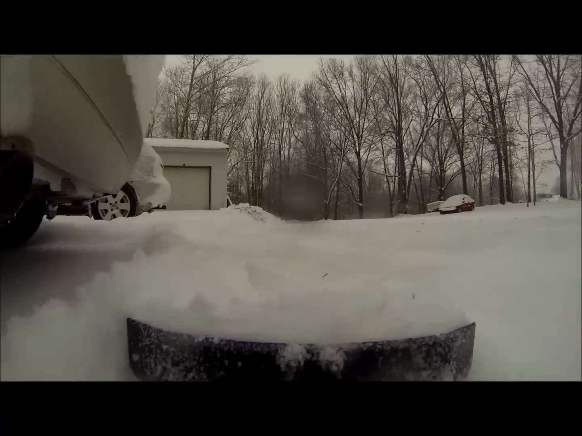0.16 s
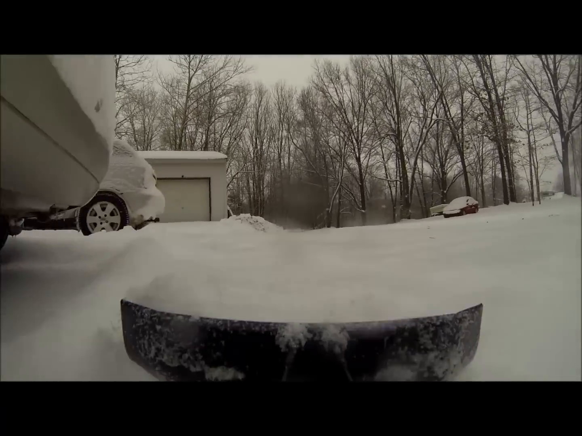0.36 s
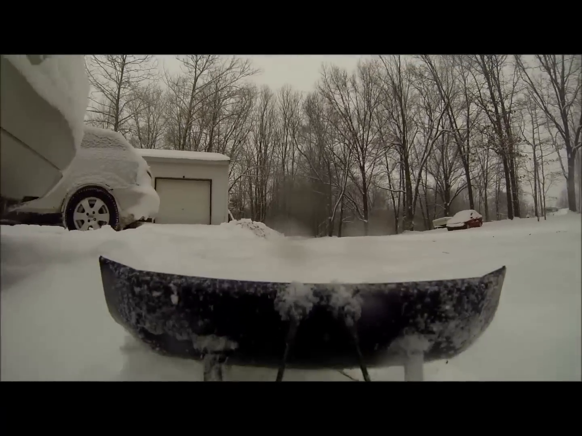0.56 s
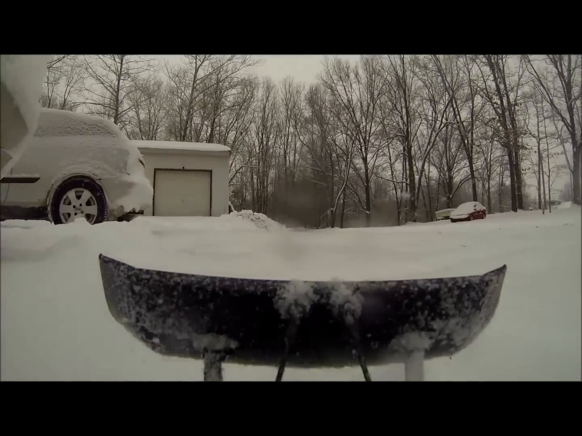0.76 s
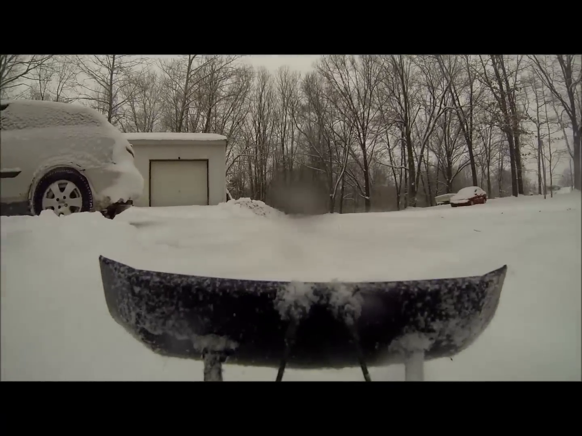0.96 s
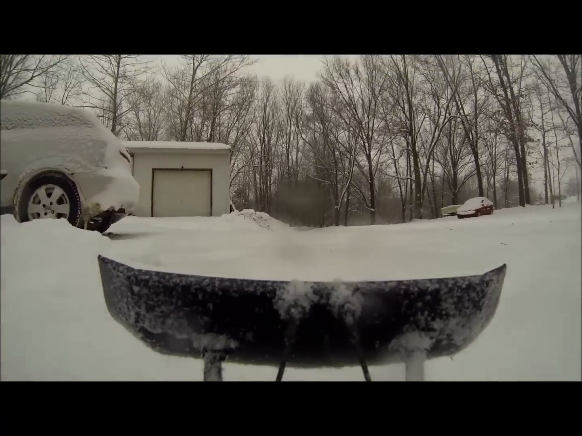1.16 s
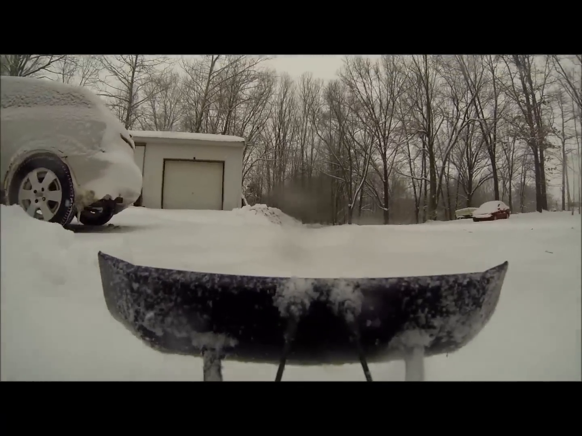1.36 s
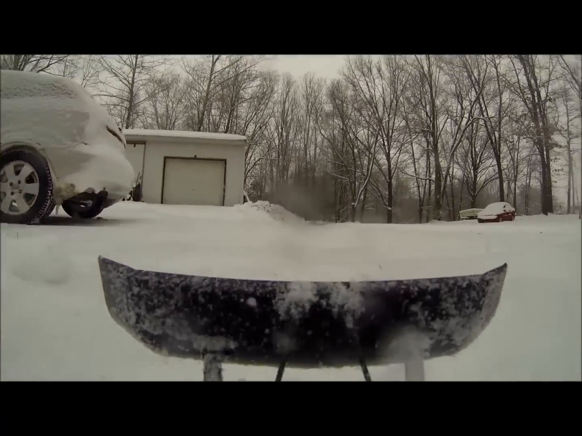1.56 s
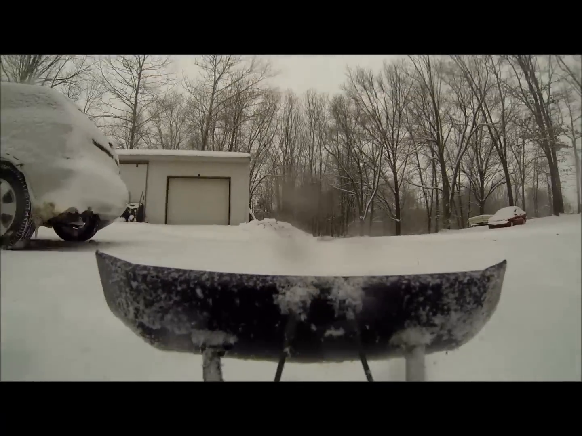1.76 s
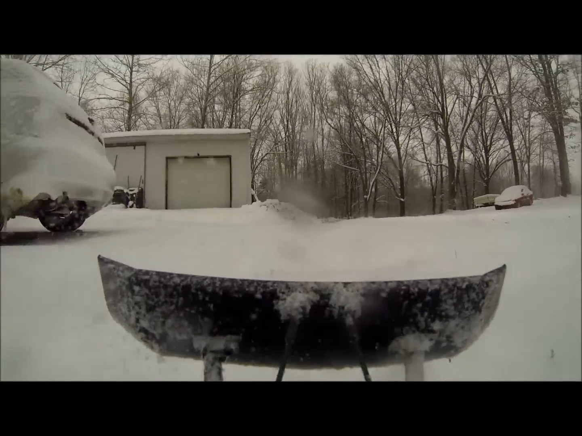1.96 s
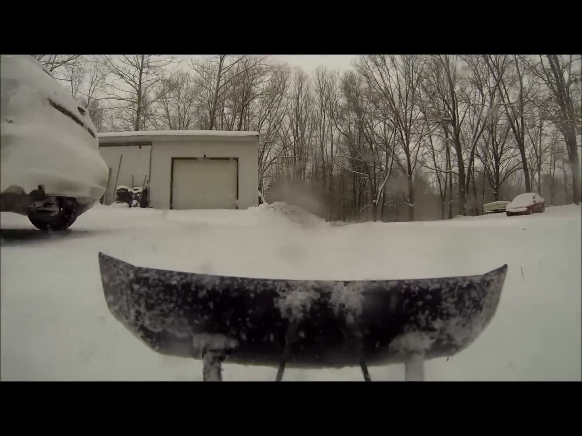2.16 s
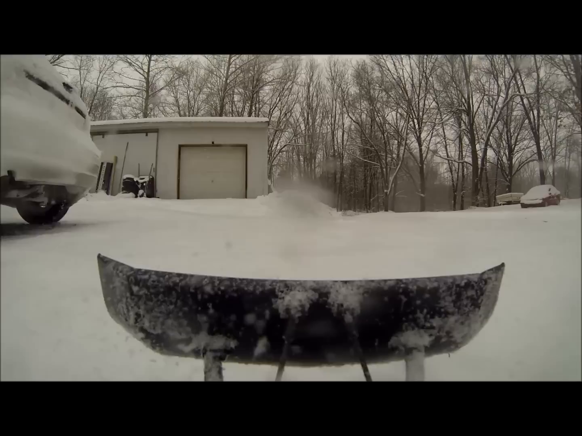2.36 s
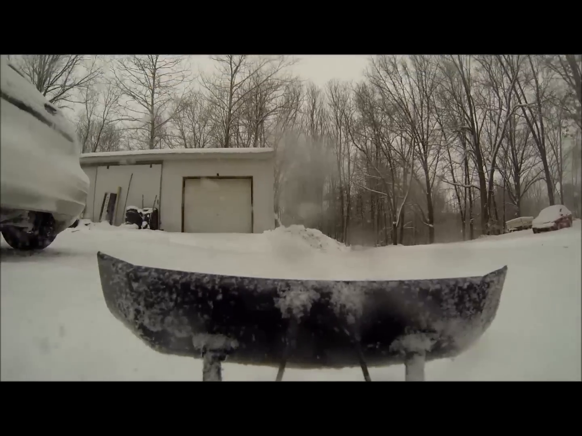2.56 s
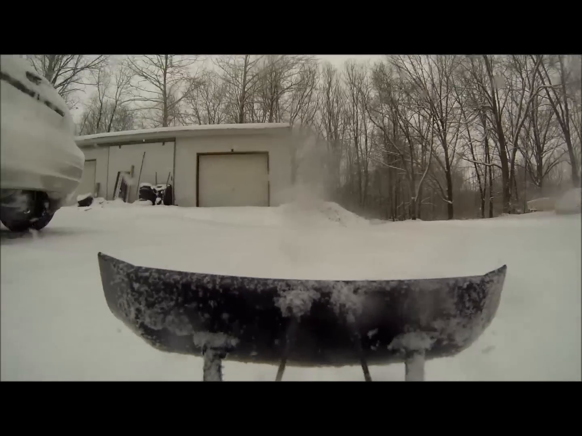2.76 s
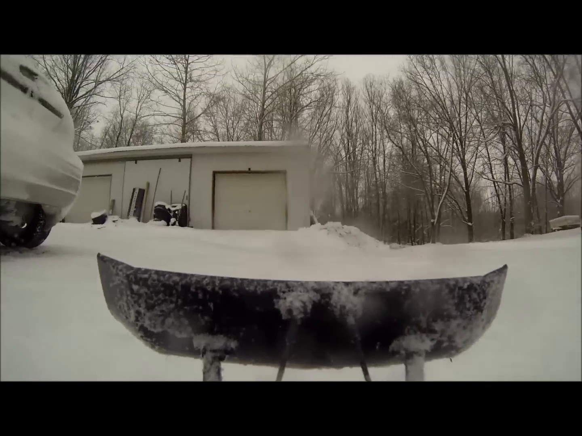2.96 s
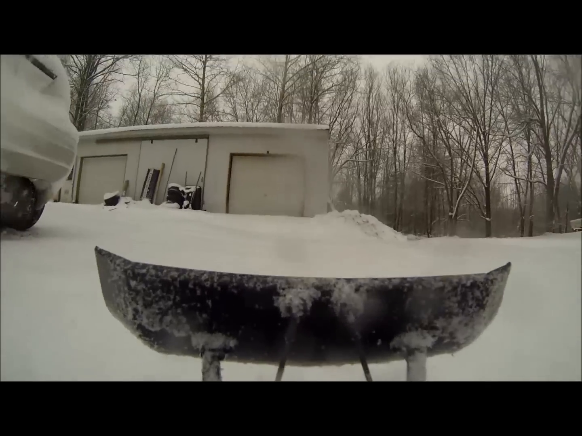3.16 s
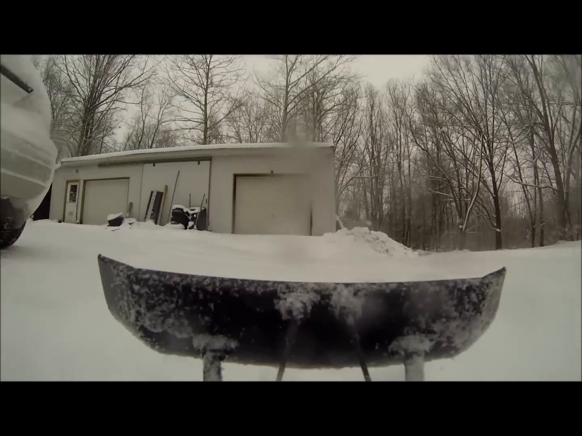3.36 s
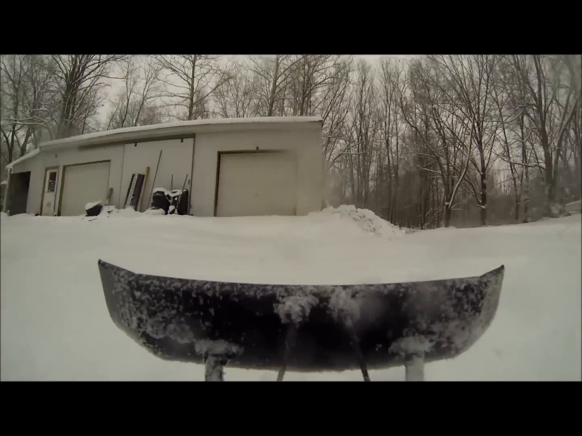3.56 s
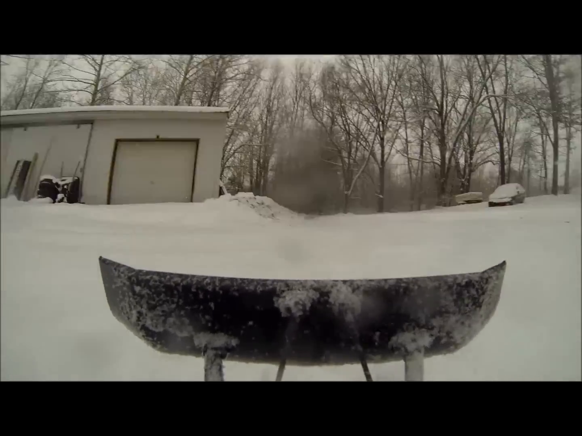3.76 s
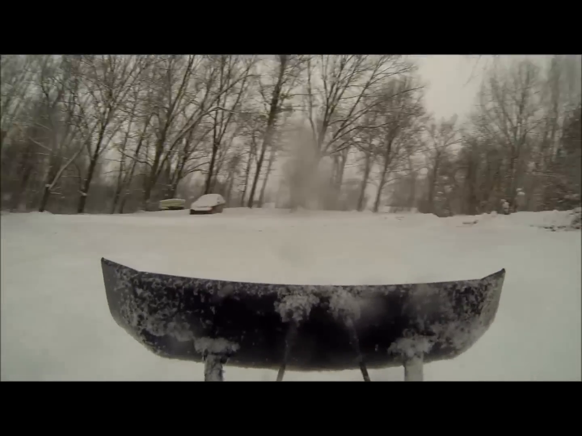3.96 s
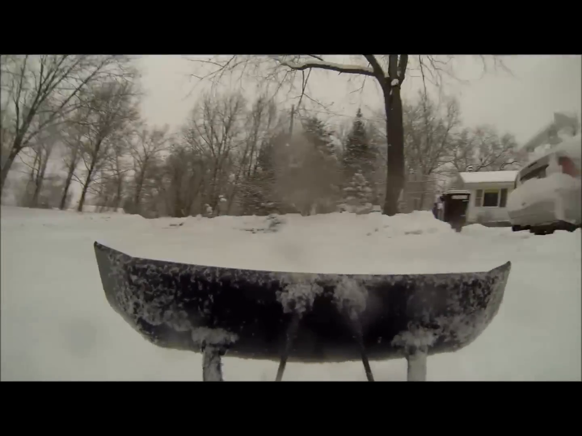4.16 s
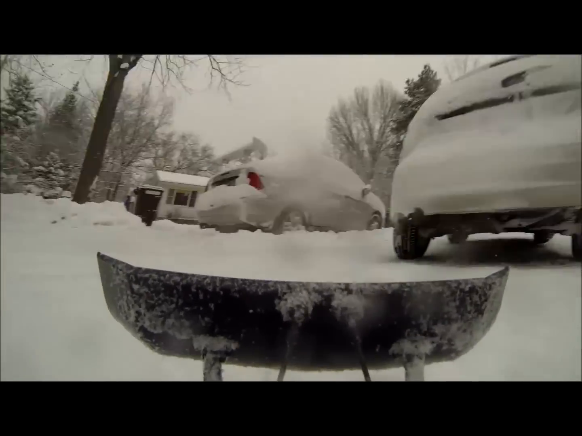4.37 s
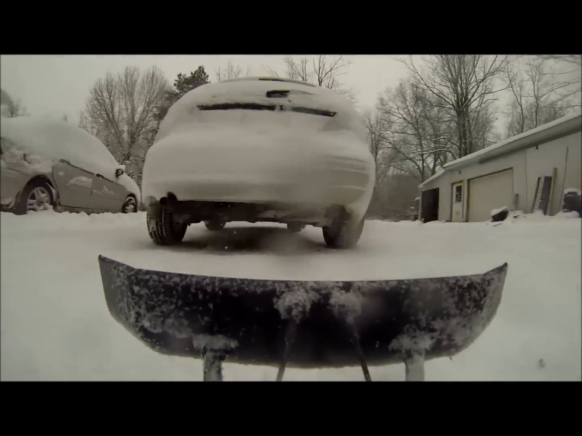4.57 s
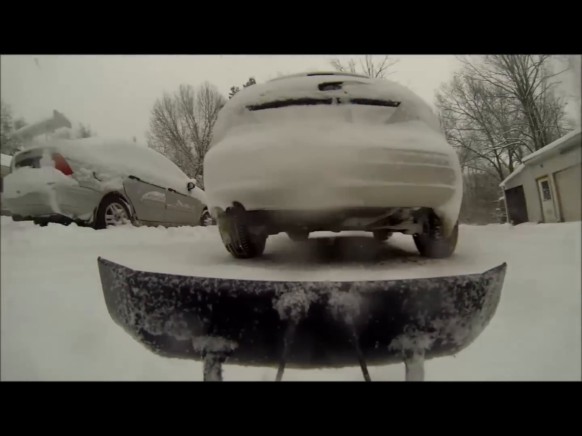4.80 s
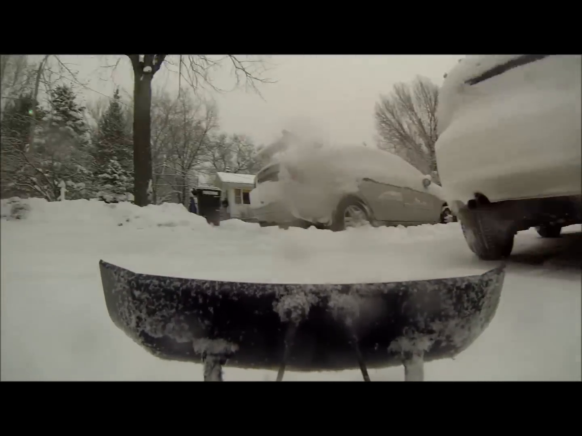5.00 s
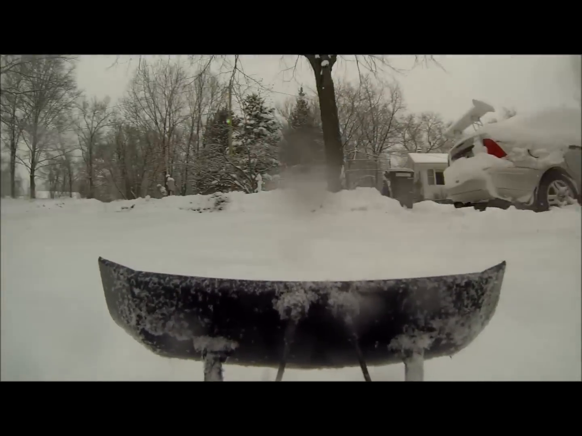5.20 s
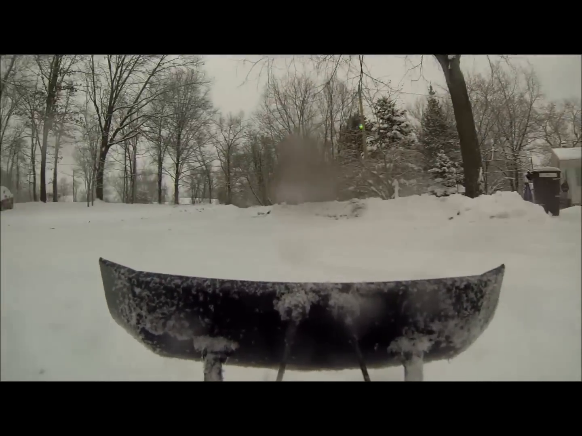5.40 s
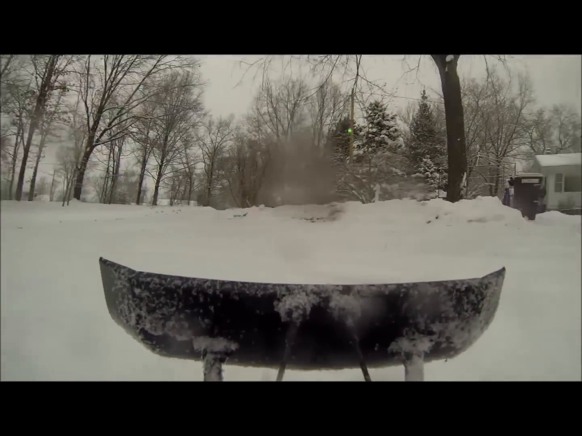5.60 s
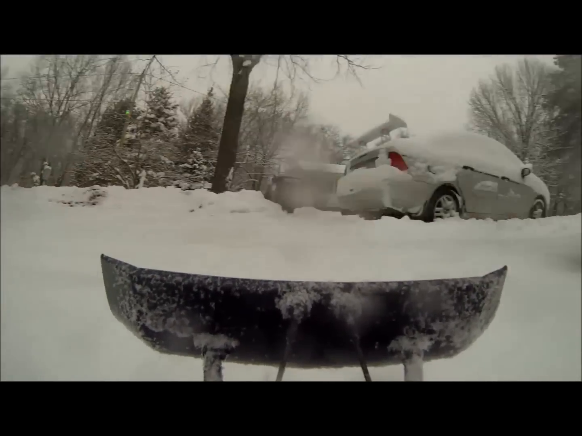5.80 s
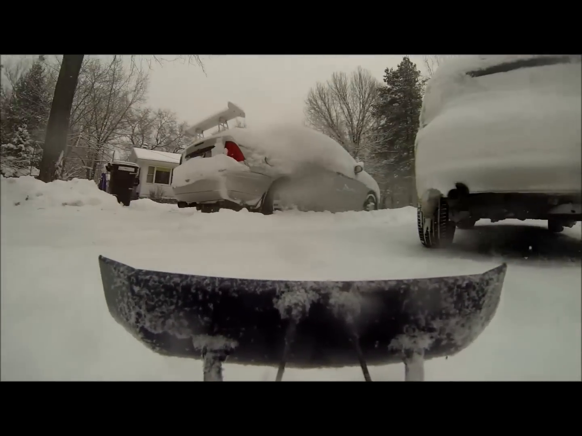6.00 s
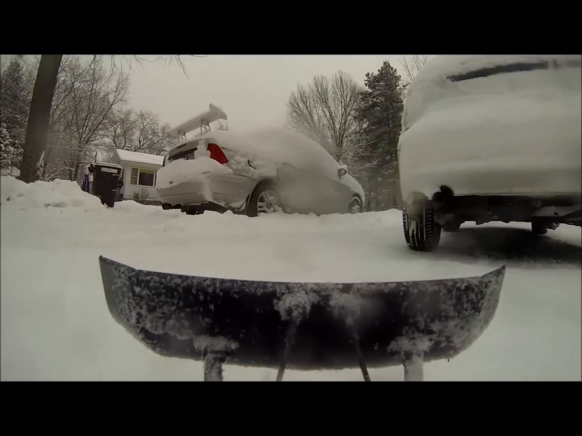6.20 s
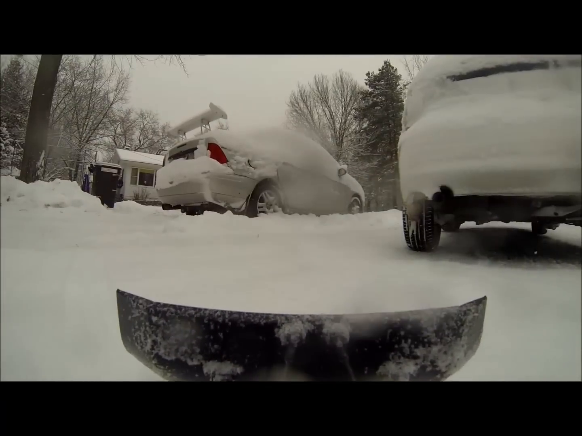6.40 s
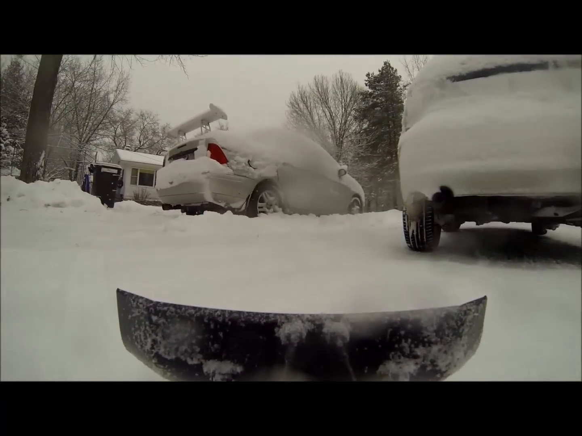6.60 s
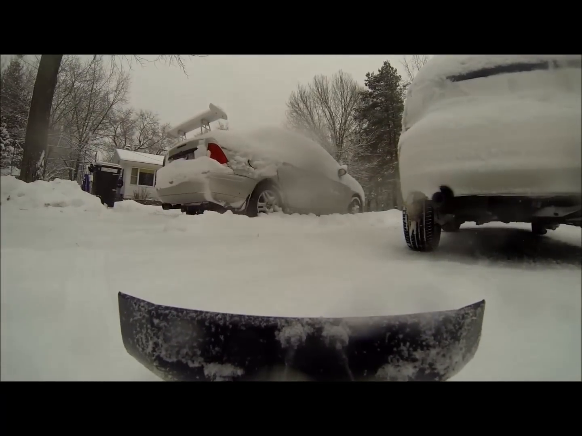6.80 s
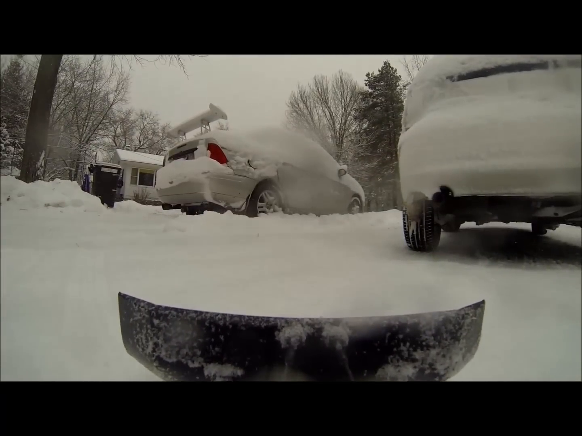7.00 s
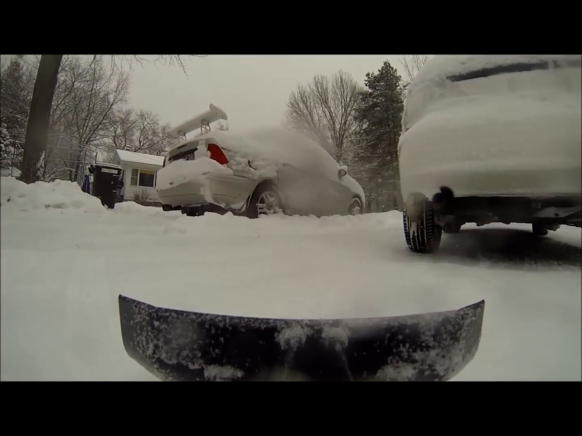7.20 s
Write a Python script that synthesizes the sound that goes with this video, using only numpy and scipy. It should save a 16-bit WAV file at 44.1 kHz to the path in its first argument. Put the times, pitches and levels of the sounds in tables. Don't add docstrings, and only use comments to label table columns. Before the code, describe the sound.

Inside a sealed case bolted to a small motorised snow plough, tracks and gears grind roughly, with low rumble, thumps, nasal metallic ringing, wavering motor whine and icy ticks. Squeals crowd the turn around five seconds. Drive stops after six seconds; the blade lowers in two knocking jerks with a faint servo buzz between, and finally the gears bite again.

```python
import sys
import numpy as np
from scipy import signal
from scipy.fft import rfft, irfft, next_fast_len
from scipy.io import wavfile
from scipy.ndimage import uniform_filter1d, map_coordinates

SR = 44100
rng = np.random.default_rng(int(sys.argv[2]) if len(sys.argv) > 2 else 0)


def dump_mix(stems):
    frames = np.atleast_2d(stems).T
    limited = np.clip(frames, -1, 1)
    pcm = np.round(limited * 32767).astype(np.int16)
    wavfile.write(sys.argv[1], SR, pcm)


def ratio_of_db(decibels):
    return 10 ** (np.asarray(decibels, float) / 20)


N = 319725
T = np.arange(N) / SR

# frequency_hz, density_db
HISS_SPECTRUM = [(30, 0), (100, -27), (300, -34.5), (1300, -42.5), (5000, -51.5), (9000, -57.5),
                 (12800, -61), (13100, -76)]
# first_s, last_s, rate_per_s, level_db
SERVO_PULSES = (6.3951, 6.72, 45.63, -52)
# centre_hz, width_hz, level_db
SERVO_MODES = [(100, 90, 3), (205, 60, 8), (375, 95, 5), (727, 30, -3), (1000, 300, -24), (1290, 125, 5),
               (1480, 130, -12), (2280, 180, -13), (3050, 300, -22), (3700, 500, -26)]
# start_s, push_db, sign, pitch_hz, t60_s
SWAYS = [
    (4.245, -7, -1.6, 15, 0.69),
    (6.24, -14.5, 0.93, 9.15, 0.75),
    (6.373, -3.5, -1.7, 13.5, 0.18),
    (6.389, -16, 1, 22.8, 0.46),
    (6.416, -2, 0.93, 12.46, 0.49),
    (6.818, -25, 1, 28, 0.36),
    (6.672, -20, 0.95, 14.8, 0.53),
    (6.841, -10, 0.89, 16.5, 0.38),
    (7.05, -29.5, -0.78, 18, 0.67),
    (7.229, -1.5, -1, 48, 0.34),
]
# start_s, peak_db, low_db
TICKS = [(1.2827, -51, 0), (1.4215, -44.5, -11), (1.6385, -43, -5.5), (1.7371, -46, -6),
         (1.9724, -55.5, -5), (2.3481, -58, 14), (2.6114, -54, -5), (2.7947, -38.5, -4), (3.0834, -41, -7),
         (3.121, -35, -12), (3.1396, -39, -14), (3.282, -32, -4), (3.3315, -36, -18), (3.6066, -44.5, -1),
         (3.7113, -46.5, -6), (3.7245, -45, -12), (3.758, -46.5, 2), (3.8046, -38, -13), (4.0706, -43, -8),
         (4.0977, -51, -8), (4.177, -32.5, -1), (4.2165, -57.5, 18), (4.2525, -34.5, 2), (4.273, -52, 4),
         (4.286, -44, -12), (4.289, -44.5, -12), (4.3616, -38.5, -16), (4.847, -53, -6), (5.0789, -44, 1),
         (5.0908, -37, 0), (5.03, -56, 10), (5.24, -58, 16), (6.357, -62, 9), (6.364, -61.5, 11),
         (6.733, -64, 13), (6.886, -71.5, 6)]
# start_s, peak_db, thud_db
KNOCKS = [(6.173, -48, 23), (6.221, -43, 15), (6.239, -19.5, -13), (6.247, -28, -8), (6.335, -37, -3),
          (6.345, -35, -4), (6.358, -36, -6), (6.144, -52, 0), (6.164, -56, 4), (6.733, -36, -13),
          (6.757, -26, -11), (6.788, -43, 2), (6.824, -58, 7), (6.886, -59, -6)]
# centre_hz, width_hz, level_db
LINKAGE_MODES = [(930, 250, -6), (1200, 350, 0), (1450, 300, -3), (2200, 450, 0), (3900, 900, -22)]
# centre_hz, width_hz, level_db
SPRAY_MODES = [(5720, 670, -2.5), (6500, 1500, -11.5), (7130, 400, -7.5), (7840, 550, -2),
               (9560, 1600, -11), (8400, 650, -5), (11100, 2900, -17), (12950, 1400, -21)]
# start_s, end_s, level_db
POWDER_GUSTS = [
    (4.58, 5.47, -3.5),
    (5.481, 6.11, 2.5),
    (6.257, 6.327, 11.5),
    (6.716, 6.79, -9.5),
]
# start_s, peak_db, pitch_hz
CATCHES = [(0.0786, -13, 1323), (0.208, -6, 1335), (0.2633, -11.5, 1375), (0.386, -8, 1327),
           (0.3915, -2, 1357), (0.5522, -11, 1430), (0.595, -4.5, 1321), (0.644, -21, 1410),
           (0.6814, -11.5, 1390), (0.848, -13, 1340), (0.9976, -9.5, 1396), (1.1635, -6, 1410),
           (1.2853, -12.5, 1450), (1.5658, -16, 1479), (1.8595, -9, 1425), (2.5304, -8, 1358),
           (2.9342, -13, 1421), (2.9617, -12, 1360), (3.056, -8, 1360), (3.165, -10, 1410),
           (3.274, -13, 1340), (3.35, -8.5, 1380), (3.9817, -15, 1301), (4.2113, -15, 1470),
           (4.4623, -12, 1493), (4.9272, -8.5, 1316), (4.981, -17, 1310), (5.486, -8.5, 1400),
           (5.623, -10.5, 1475)]
# start_s, peak_db, pitch_hz
CHIRPS = [(1.1947, -34, 4833), (1.284, -30, 4990), (1.8592, -32, 4842), (1.944, -36, 4840),
          (2.0627, -40, 4800), (2.5052, -37, 5190), (2.8335, -37, 5060), (2.9203, -30, 4896),
          (3.0375, -31.5, 4960), (3.2086, -37, 5040), (3.4326, -32.5, 4910), (4.7556, -31, 4940),
          (4.815, -35, 4890), (4.9876, -33, 4810), (5.1776, -37, 4850), (5.3926, -40, 4970)]
# start_s, peak_db, pitch_hz
SETTLINGS = [
    (6.821, -60, 1440),
    (6.888, -62, 1450),
    (7.2252, -16, 1304),
    (7.2312, -20, 1254),
    (7.24553, -5, 1286),
]
# start_s,
# peak_db, pitch_hz
THUMPS = [(0.087, -17.5, 204), (0.364, -14.5, 180), (0.438, -6, 293), (0.825, -18, 233), (1.007, -9.5, 269),
          (1.099, -13, 300), (1.174, -5.5, 304), (1.452, -17, 317), (3.046, -10.5, 292),
          (3.325, -16.5, 197), (3.654, -12, 271), (4.062, -5, 159), (4.151, -7, 296), (4.414, -9, 242),
          (4.866, -12, 143), (5.497, -12, 143), (5.616, -7, 186), (5.973, -22, 199), (6.054, -10.5, 221),
          (6.173, -12, 90), (6.1735, -19, 228)]
# start_s, peak_db, pitch_hz
THROBS = [(0.118, -3, 56), (0.264, -11, 59.4), (0.51, -10, 82.5), (0.855, -9.5, 78.4), (1.033, -10, 105),
          (1.159, -10, 74.6), (1.376, -8, 91.5), (1.709, -9.5, 94.2), (2.047, -7, 99.5), (2.41, -11, 70.0),
          (2.744, -18, 83.4), (2.921, -9, 98.4), (3.167, -11, 83.4), (3.445, -13, 97), (3.737, -19, 102),
          (3.992, -6, 87.5), (4.729, -8, 72.7), (4.838, -7, 109), (5.02, -10, 80.7), (5.425, -10, 61.9),
          (5.878, -9, 75), (6.068, -5.5, 68.5)]
# start_s, peak_db, pitch_hz
RESTART_JERKS = [
    (7.2348, -14, 563),
    (7.2435, -4.5, 280),
]
# start_s, end_s, first_hz, last_hz, level_db
SQUEALS = [(.01, .19, 1380, 1330, -28), (.5, .64, 1390, 1340, -26), (.75, .95, 2200, 2270, -36),
           (.78, 1.05, 3020, 3090, -45), (.84, .96, 880, 1010, -39), (.97, 1.06, 3750, 4050, -46),
           (1.07, 1.22, 1320, 1400, -28), (2.05, 2.5, 1545, 1550, -36), (4.5, 4.54, 2150, 2280, -30),
           (4.725, 4.8, 1250, 1420, -24), (4.73, 4.78, 5000, 4620, -46), (4.79, 4.83, 1560, 1500, -30),
           (4.81, 4.893, 1450, 1330, -23), (4.8, 4.86, 5100, 4800, -46), (4.83, 4.88, 3750, 3850, -47),
           (4.74, 5.0, 660, 590, -39), (4.893, 4.952, 1360, 1290, -22.5), (4.955, 5.025, 1350, 1290, -22.5),
           (4.97, 5.07, 1150, 1100, -37), (5.1, 5.165, 890, 850, -39), (5.165, 5.34, 725, 680, -35),
           (5.16, 5.25, 1490, 1420, -27), (5.25, 5.34, 1420, 1320, -25), (5.17, 5.3, 4850, 4880, -52),
           (5.3, 5.345, 4850, 4600, -49), (5.29, 5.335, 2330, 2380, -31), (5.38, 5.46, 1020, 1080, -39),
           (5.525, 5.569, 2300, 2240, -23), (5.6, 5.68, 3350, 3650, -44), (3.8, 4.2, 290, 265, -28),
           (5.55, 5.8, 290, 260, -28), (6.103, 6.135, 1450, 1380, -38), (6.25, 6.33, 1400, 1310, -43),
           (6.262, 6.31, 3700, 4000, -61), (6.265, 6.32, 2750, 2800, -59), (6.357, 6.376, 2290, 2290, -48),
           (6.357, 6.376, 3950, 3900, -54), (6.727, 6.752, 740, 735, -48)]
# start_s, end_s, first_hz, last_hz, level_db
SQUEAKS = [(4.64, 4.66, 6100, 5900, -59), (4.745, 4.77, 5750, 5750, -62), (4.91, 5.0, 6550, 6550, -69),
           (5.02, 5.05, 7000, 7000, -64), (5.05, 5.07, 6600, 6500, -62), (5.335, 5.37, 5950, 5650, -63),
           (5.425, 5.45, 5900, 5750, -63)]
# time_s, commutator_hz, level_db
MOTOR_WHINE = [(0, 306.2, -33), (.45, 300, -21.5), (.7, 306.2, -28), (1.05, 300, -36.5), (1.19, 310.3, -27),
               (1.5, 317.7, -24.5), (1.75, 312.2, -28), (2.15, 327.5, -24.5), (2.5, 334.6, -27),
               (2.75, 316.2, -29), (2.9, 300, -38.5), (3.45, 319.1, -24.5), (3.6, 341.6, -27),
               (3.95, 336.3, -24), (4.1, 314.5, -27.5), (4.51, 304, -32.5), (4.6, 314, -40)]
# multiple, level_db
MOTOR_PARTIALS = [(.312, 3.5), (1, -0.5), (2, -16)]
# centre_hz, width_hz, level_db
FRAME_MODES = [(34.9, 86, -5.5), (64.4, 23, 2), (90.8, 21.7, 1), (170, 27, -19.5), (211.5, 125, -7),
               (306.3, 68, -7), (390, 71, -16), (615, 143, -18.5)]
# centre_hz, width_hz, level_db
SHELL_MODES = [(1050, 450, -28.5), (1338, 260, -14.5), (1492, 270, -14.5), (2156, 350, -25),
               (2250, 297, -23.5), (2618, 150, -34.5), (3054, 280, -30.5), (3240, 160, -34),
               (3490, 140, -31), (3832, 434, -28.5), (4500, 180, -35), (4960, 460, -32)]
MESH_HZ = [1375, 2290, 3080, 4930]
# time_s, pitch_hz
MOUNT_FLEX = [(0.0, 1370), (0.07, 1310), (0.25, 1380), (1.03, 1350), (1.72, 1450), (1.77, 1390),
              (2.05, 1460), (3.58, 1370), (3.72, 1450), (3.94, 1380), (4.6, 1430), (4.72, 1310),
              (4.81, 1420), (4.94, 1300), (5.21, 1430), (5.28, 1380), (5.93, 1390), (6.1, 1460)]
# time_s, load_db, gear_strain_db, ground_roughness_db
TRACK_LOAD = [(0.0, -37, 0, 2), (0.03, -41.5, -0.5, -1.5), (0.59, -36, 0, 0), (0.64, -39, -0.5, -3.5),
              (1.03, -35, -1, -0.5), (1.15, -40.5, -1, -0.5), (3.28, -41, 0, 1), (3.43, -39, -0.5, -0.5),
              (3.72, -43.5, -0.5, 4.5), (3.77, -39.5, -1.5, -1), (4.37, -43, -3, -4.5),
              (4.52, -36.5, -1.5, -1.5), (4.59, -43.5, 0.5, 3.5), (4.72, -40, -2, 2), (5.59, -46.5, -1, 1),
              (5.61, -40, 0, 1.5), (6.07, -49.5, 0.5, -0.5), (6.1, -53.5, 3, -1)]
MEAN_DB = [-19, -24, -25.5, -43.5, -58]
BY_LOAD = [.1, 0.46, 0.6, 0.98, 0.84]
BY_STRAIN = [-0.31, -0.15, 1, 0, -0.88]
BY_GROUND = [1, .5, 0.0094, 0.22, 0.3]
# start_s, lurch_db, dip_db, recovery_s
LUMPS = [(0.741, 7, 4, 0.055), (1.398, 3, 9.5, 0.042), (1.669, 12.5, 7, 0.07), (2.559, 5, 13.5, 0.015),
         (2.95, 5, 8.5, 0.03), (3.569, 7, 4, 0.14), (3.7, 1, 4, 0.057), (4.031, 1, 4.5, 0.041),
         (4.098, 7, 7.5, 0.044), (4.19, 6, 2, 0.023), (4.286, 2, 7.5, 0.064), (4.549, 7, 9.5, 0.03),
         (4.59, 10, 4.5, 0.082), (5.04, -11, 3, 0.13), (5.1, 1.5, 5.5, 0.026), (5.45, 4, 7, 0.014),
         (5.56, 3, 3.5, 0.051), (5.86, 4.5, 3, 0.045)]
BY_DIP = [0.54, 0.93, 0.84, 1, 0.81]
# centre_s, half_length_s, low_db, high_db
CLATTERS = [(0.047, 0.036, -2, 1), (0.572, 0.072, -0.5, 0.5), (0.855, 0.031, 1, 2), (1.03, 0.033, 2, 2.5),
            (1.181, 0.091, 2.5, 3), (1.582, 0.062, 4, 4.5), (1.867, 0.018, 3.5, 2.5),
            (3.657, 0.023, 4, -0.5), (3.798, 0.051, 0, 1), (3.912, 0.023, 2.5, 1.5), (4.347, 0.034, 2, 1.5),
            (4.076, 0.0051, 8, -1), (4.165, 0.015, 3, 0), (4.253, 0.03, 8, 3), (4.527, 0.011, 3, 0.5),
            (4.746, 0.032, 0.5, 2.5), (4.9, .1, -1, 0), (5.004, 0.017, 3.5, 5), (5.274, .08, -2.5, -1),
            (5.41, 0.028, 2.5, 1.5), (5.495, 0.025, 3.5, 2.5), (5.602, 0.073, -0.5, 4.5),
            (5.84, 0.049, 2, 0), (6.103, 0.029, -1, -2)]
# centre_s, half_length_s, rumble_db
HEAVES = [(0.017, .05, 4), (0.283, 0.018, 7.5), (0.331, .03, -19), (.62, .05, 1.5), (0.793, .03, -1),
          (1.376, 0.046, 0.5), (1.458, .04, -6), (1.784, 0.02, -5), (2.2, 0.22, 1), (3.01, 0.025, -10),
          (3.125, 0.026, 1.5), (3.7, .02, -7), (4.263, .03, -1.5), (4.635, 0.021, -12), (4.94, 0.026, -7.5),
          (5.352, 0.029, -6.5), (5.44, .04, 1), (5.592, 0.017, -3), (5.72, 0.045, 2), (5.853, .03, -2),
          (5.91, 0.037, 4), (6.035, 0.022, -2.5)]
COAST_DB_PER_S = [73.6, 300, 905, 800, 600]
# start_s, end_s, level_db, low_range_weight_db
BLADE_STROKES = [
    (6.17, 6.198, -28, 28.5),
    (6.221, 6.362, 0.5, -5),
    (6.338, 6.355, 3, -3),
    (6.719, 6.742, 4.5, -12.5),
    (6.763, 6.793, -22, 15),
]
STROKE_DB = [-46, -36.5, -44.5, -55, -69]
BY_WEIGHT = [1.45, 0.94, 0.36, 0.13, 0]
RELEASE_DB_PER_S = [201, 402, 900, 900, 900]
# start_s, swell_db_per_s, first level_db of each range
RESTART = (7.2235, 460, [-36.5, -31, -34, -56.5, -75])


def unit(x):
    return x / np.sqrt(np.mean(x ** 2) + 1e-20)


def curves(rows):
    s, *cols = np.transpose(rows)
    return [np.interp(T, s, c) for c in cols]


def wobble(rate):
    coarse = T[::16]
    knots = rng.standard_normal(N // 64)
    return np.interp(T, coarse, map_coordinates(knots, [coarse * rate]))


def filtered(x, response):
    m = next_fast_len(N + SR // 2)
    return irfft(rfft(x, m) * response(np.fft.rfftfreq(m, 1 / SR)), m)[..., :N]


def modes(table):
    def response(f):
        power = 0
        for centre, width, db in table:
            damping = (f * width) ** 2
            power = power + ratio_of_db(2 * db) * damping ** 2 / ((centre ** 2 - f * f) ** 2 + damping) ** 2
        cepstrum = irfft(np.log(power + 1e-14) / 2)
        cepstrum[1:len(f) - 1] *= 2
        cepstrum[len(f):] = 0
        return np.exp(rfft(cepstrum))
    return response


def band(lo, hi):
    return lambda f: 1 / np.sqrt((1 + (lo / (f + 1)) ** 16) * (1 + (f / hi) ** 16))


def tone(hz, blur):
    return 2 * np.pi * np.cumsum(hz * (1 + blur * wobble(40))) / SR


def burst(t60):
    t = T[:SR // 20]
    return rng.standard_normal(len(t)) * ratio_of_db(-60 * t / t60)


def rings(events, shift_db, t60, rise):
    out, t = np.zeros(N + SR), T[:SR // 5]
    for s, db, hz in events:
        envelope = ratio_of_db(db + shift_db - 60 * t / t60) * (1 - np.exp(-t / rise))
        out[round(s * SR):][:len(t)] += envelope * np.sin(2 * np.pi * hz * t)
    return out[:N]


def patchy(depth_db):
    z = signal.stft(rng.standard_normal(N), nperseg=256)[2]
    field = uniform_filter1d(rng.standard_normal(z.shape), size=4, axis=0)
    field = uniform_filter1d(field, size=8, axis=1)
    return unit(signal.istft(z * ratio_of_db(depth_db * unit(field)), nperseg=256)[1][:N])


def floor():
    hz, db = np.transpose(HISS_SPECTRUM)

    def colour(f):
        return ratio_of_db(np.interp(np.log(f + 1), np.log(hz), db)) * band(35, 15300)(f)
    hiss = filtered(rng.standard_normal(N), colour)
    return ratio_of_db(-53.5 + 1.0 * wobble(26)) * unit(hiss)


def servo():
    first, last, rate, db = SERVO_PULSES
    at = np.arange(first, last, 1 / rate)
    alternation = .6 * (-1) ** (1 + np.arange(len(at)))
    kick = np.zeros(N)
    kick[np.round(at * SR).astype(int)] = ratio_of_db(alternation + .5 * rng.standard_normal(40)[:len(at)])
    scratch = signal.fftconvolve(kick, np.hanning(SR // 130))[:N] * rng.standard_normal(N)
    hum = filtered(kick + .045 * scratch, modes(SERVO_MODES))
    return ratio_of_db(db) * unit(hum) * np.sqrt((last - first) * SR / N)


def sway():
    out = np.zeros(N)
    for s, db, sign, hz, t60 in SWAYS:
        t = np.maximum(T - s, 0)
        onset = 1 - np.exp(-t * hz * 1.07)
        out += sign * ratio_of_db(db - 60 * t / t60) * np.sin(2 * np.pi * hz * t) * onset
    return out


def ticks():
    top, low = np.zeros((2, N + SR))
    for s, db, low_db in TICKS:
        top[round(s * SR):][:SR // 20] += ratio_of_db(db + 1.0) * burst(0.0063)
        low[round(s * SR):][:SR // 20] += ratio_of_db(db + low_db) * burst(0.0089)
    return filtered(top[:N], band(9000, 13800)) + filtered(low[:N], band(5500, 9000))


def knocks():
    blow, thud = np.zeros((2, N + SR))
    for s, db, thud_db in KNOCKS:
        blow[round(s * SR)] += ratio_of_db(db + 22)
        blow[round(s * SR):][:SR // 20] += ratio_of_db(db + 13) * burst(.02)
        thud[round(s * SR)] += ratio_of_db(db + thud_db + 43)
    softened = uniform_filter1d(blow[:N], size=6)
    return filtered(softened, modes(LINKAGE_MODES)) + filtered(thud[:N], modes(FRAME_MODES[2:7]))


def spray(gain, shake):
    fizz = filtered(shake, band(2800, 5500)) ** 2
    quick = np.abs(uniform_filter1d(fizz, size=200))
    slow = np.abs(uniform_filter1d(fizz, size=2500)) + 1e-12
    thrown = (quick / slow) ** 0.27
    grains = patchy(depth_db=2.5) * ratio_of_db(1.1 * wobble(22) + 1.1 * wobble(60))
    ring = filtered(grains, modes(SPRAY_MODES))
    coarse = filtered(ring, band(5300, 7000))
    powder = filtered(ring, band(7000, 15300))
    gust_db = 0
    for start, end, db in POWDER_GUSTS:
        gust_db = gust_db + db * np.clip(np.minimum(T - start, end - T) / .03, 0, 1)
    return gain * thrown * unit(coarse + ratio_of_db(gust_db) * powder)


def catches():
    high = rings(CATCHES, -3, t60=0.047, rise=0.0014)
    high += rings(CHIRPS, -1.2, t60=0.078, rise=0.0011)
    high += rings(SETTLINGS, 2.5, t60=0.059, rise=0.0012)
    low = rings(THUMPS, -1.5, t60=0.1, rise=0.0033)
    low += rings(THROBS, -2.0, t60=0.23, rise=.012)
    low += rings(RESTART_JERKS, 1.5, t60=0.03, rise=0.0011)
    return high * ratio_of_db(2.6 * wobble(150)) + low


def squeals():
    out = np.zeros(N)
    tremble = .013 * wobble(90) + .007 * wobble(22)
    throb_db = 2 * wobble(45) + 2.5 * wobble(130)
    for start, end, first_hz, last_hz, db in list(SQUEALS) + list(SQUEAKS):
        part = slice(round(start * SR), round(end * SR))
        t = T[part]
        hz = np.interp(t, [start, end], [first_hz, last_hz]) * (1 + tremble[part])
        turn = 2 * np.pi * np.cumsum(hz) / SR
        gate = np.clip(np.minimum(t - start, end - t) / .004, 0, 1)
        out[part] += gate * ratio_of_db(db + 1.8 + throb_db[part]) * (np.sin(turn) + .11 * np.sin(turn / 2))
    return out


def motor():
    hz, db = curves(MOTOR_WHINE)
    turn = tone(hz, blur=.016)
    on = np.clip((MOTOR_WHINE[-1][0] - T) / 0.1, 0, 1)
    return on * sum(ratio_of_db(db + level + 2.4 * wobble(18)) * np.sin(k * turn) for k, level in MOTOR_PARTIALS)


def column(values):
    return np.asarray(values, float)[:, None]


def bump(t, centre, half):
    return np.exp(-((t - centre) / half) ** 2)


def shaking():
    t = T[::32]
    load, strain, ground = [c[::32] for c in curves(TRACK_LOAD)]
    db = column(MEAN_DB) + column(BY_LOAD) * (load - np.mean(TRACK_LOAD, axis=0)[1])
    db = db + column(BY_STRAIN) * strain + column(BY_GROUND) * ground
    lurch_s, dip_s = 0.014, 0.0016
    for s, lurch_db, dip_db, recovery in LUMPS:
        after = np.maximum(t - s, 0)
        db[0] += lurch_db * bump(t, s - lurch_s, lurch_s)
        db -= column(BY_DIP) * dip_db * np.clip(after / dip_s, 0, 1) * np.exp(-after / recovery)
    for s, half, low_db, high_db in CLATTERS:
        db[1:] += column([low_db, high_db, high_db, high_db]) * bump(t, s, half)
    for s, half, heave_db in HEAVES:
        db[0] += heave_db * bump(t, s, half)
    stop_s = 6.115
    gain = ratio_of_db(db - column(COAST_DB_PER_S) * np.maximum(t - stop_s, 0))
    rise_s = 0.022
    for start, end, level_db, weight_db in BLADE_STROKES:
        fade_db = column(RELEASE_DB_PER_S) * np.maximum(t - end, 0)
        stroke_db = column(STROKE_DB) + level_db + column(BY_WEIGHT) * weight_db - fade_db
        gain += ratio_of_db(stroke_db) * np.clip((t - start) / rise_s, 0, 1)
    s, swell, first_db = RESTART
    swell_db = column(first_db) + swell * np.minimum(t - s, .05)
    gain += ratio_of_db(swell_db) * np.clip((t - s) / 0.0089, 0, 1)
    return [np.interp(T, t, g) for g in gain]


def gear_whistle():
    out = 0
    for hz in MESH_HZ:
        level = ratio_of_db(5.5 * wobble(30) + hz / 1300 - 2)
        out = out + level * np.sin(tone(hz * (1 + .02 * wobble(16)), blur=.014))
    return out


def flexed(ring):
    mid_hz, span_hz = 1410, 170
    lean = np.clip((curves(MOUNT_FLEX)[0] - mid_hz) / span_hz, -1.3, 1.3)

    def tilt(f):
        side = (f - mid_hz) / span_hz
        return side * np.exp(-side ** 2 / 2)
    return ring + lean * filtered(ring, tilt)


def drive(gains):
    chance, size = rng.random((2, N))
    jolts = (chance < 500 / SR) * ratio_of_db(-3 * np.log(size + .03)) * rng.standard_normal(N)
    force = (patchy(depth_db=1.58) + 0.54 * unit(jolts)) * ratio_of_db(0.4 * wobble(16) + 1.02 * wobble(70))
    ring = filtered(force + .065 * gear_whistle(), modes(list(FRAME_MODES) + list(SHELL_MODES)))
    ring = flexed(ring)
    edges_hz = [(20, 130), (130, 800), (800, 2800), (2800, 5500)]
    flutter_db = [1.2, 1.1, 0.64, 1.2]
    parts = [unit(filtered(ring, band(*e))) for e in edges_hz]
    swell = np.abs(uniform_filter1d(parts[0] ** 2, size=round(.07 * SR))) + .05
    parts[0] = unit(parts[0] / swell ** (.6 / 2))
    return sum(gain * ratio_of_db(own * wobble(21)) * part for gain, own, part in zip(gains, flutter_db, parts))


def scene():
    *frame, powder = shaking()
    shake = drive(frame)
    background = floor() + servo() + sway() + ticks() + knocks()
    machine = spray(powder, shake) + catches() + squeals() + motor() + shake
    return (background + machine)[None]


def low_pass(x):
    return signal.sosfilt(signal.butter(12, 15400, fs=SR, output="sos"), x)


def record(dry):
    soft = dry / (1 + np.abs(dry / .8) ** 4) ** (1 / 4)
    return low_pass(soft)


dry = scene()
out = record(dry)
dump_mix(out)
```